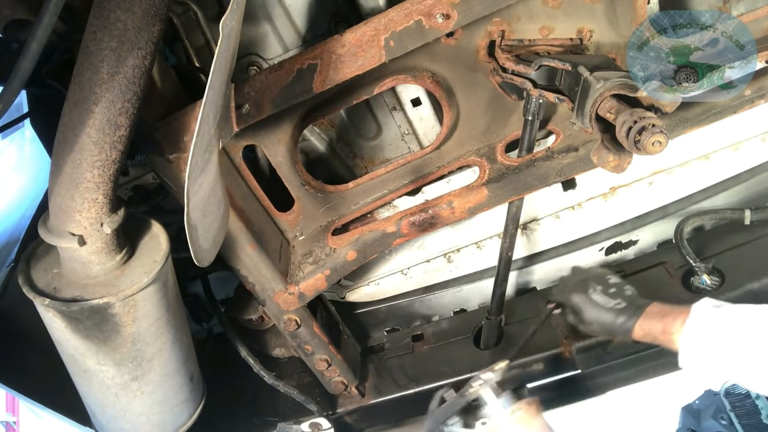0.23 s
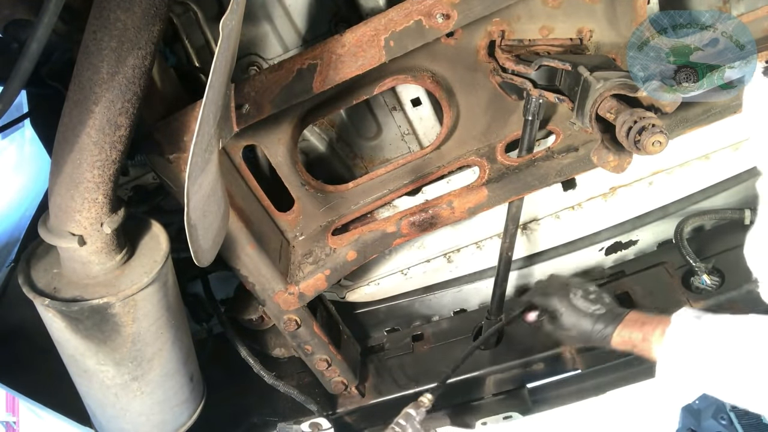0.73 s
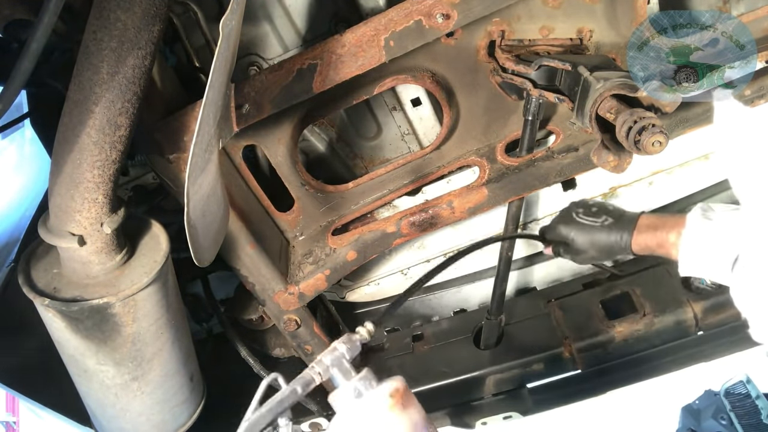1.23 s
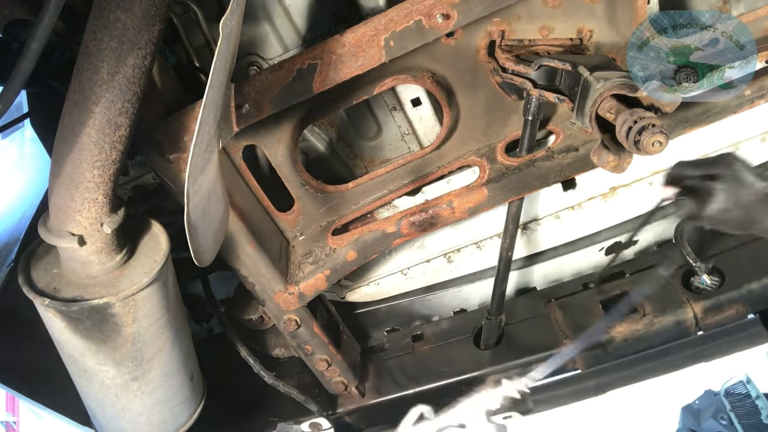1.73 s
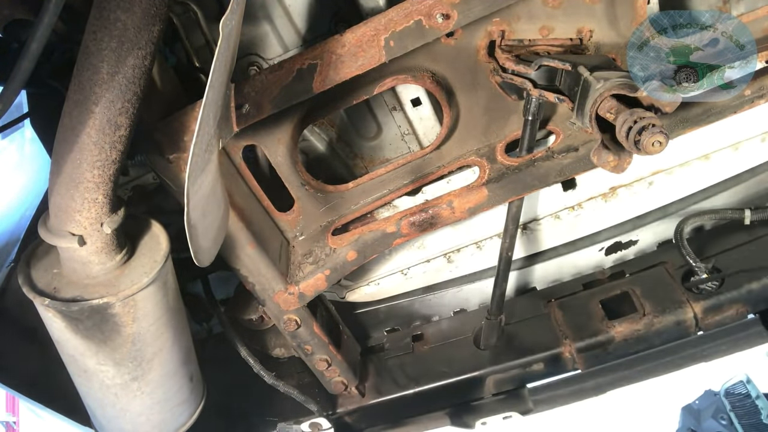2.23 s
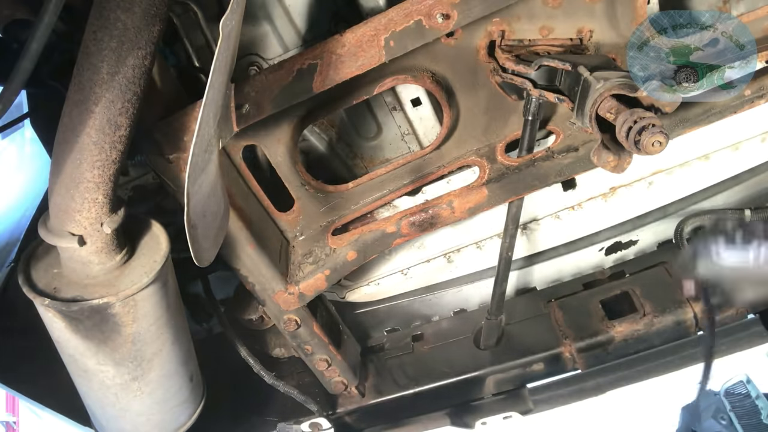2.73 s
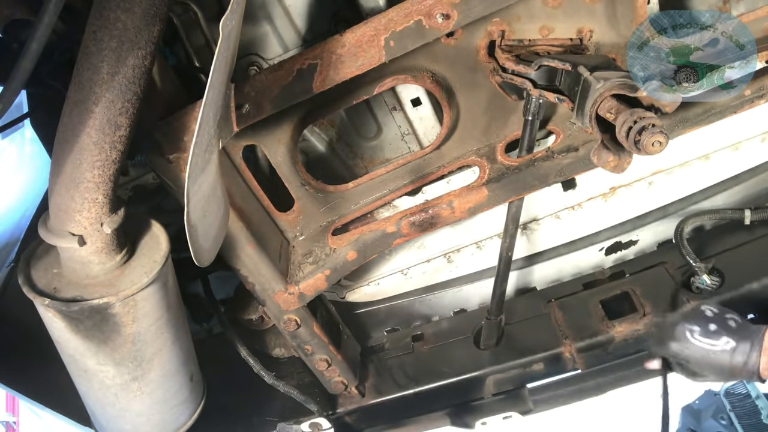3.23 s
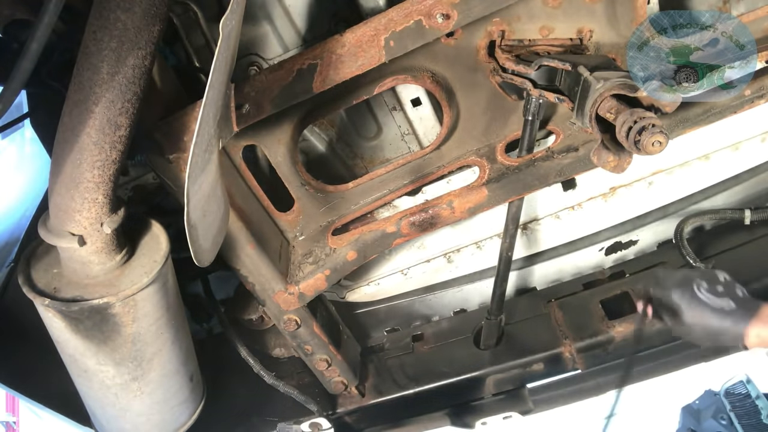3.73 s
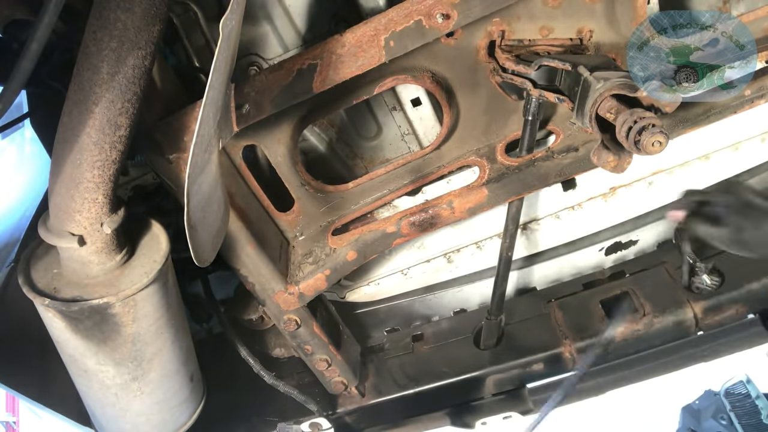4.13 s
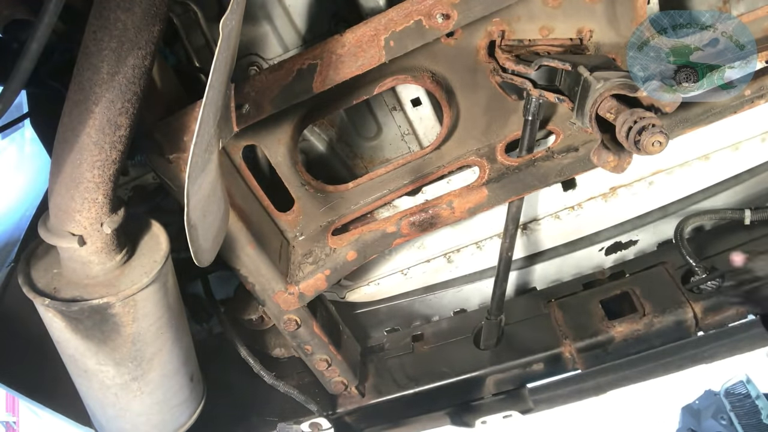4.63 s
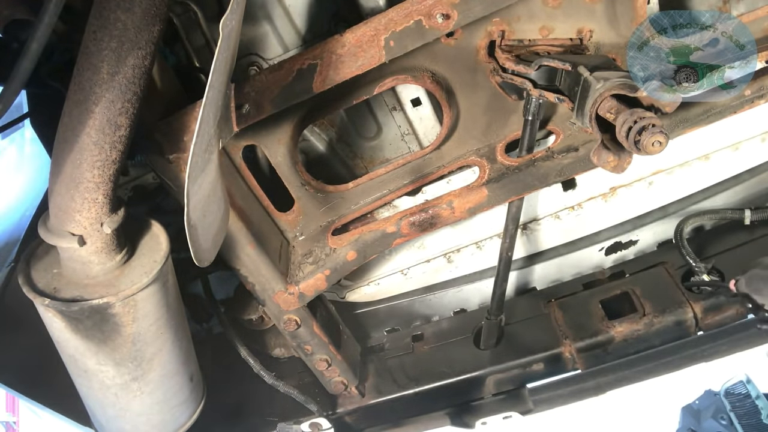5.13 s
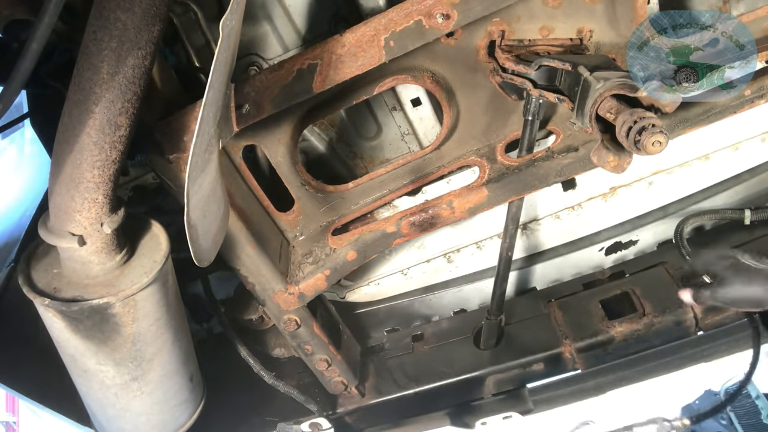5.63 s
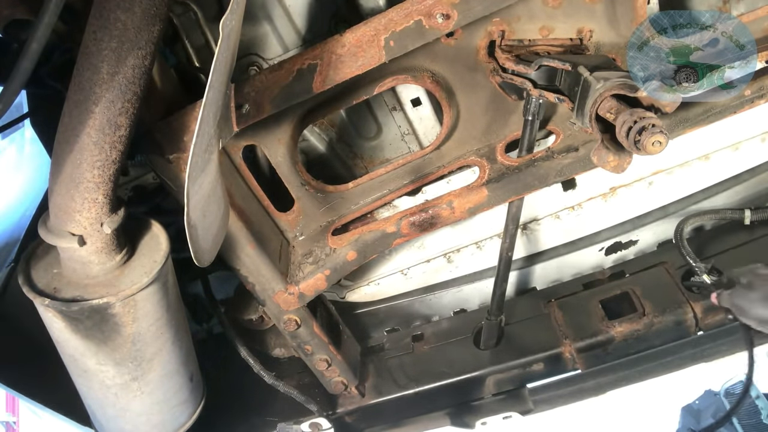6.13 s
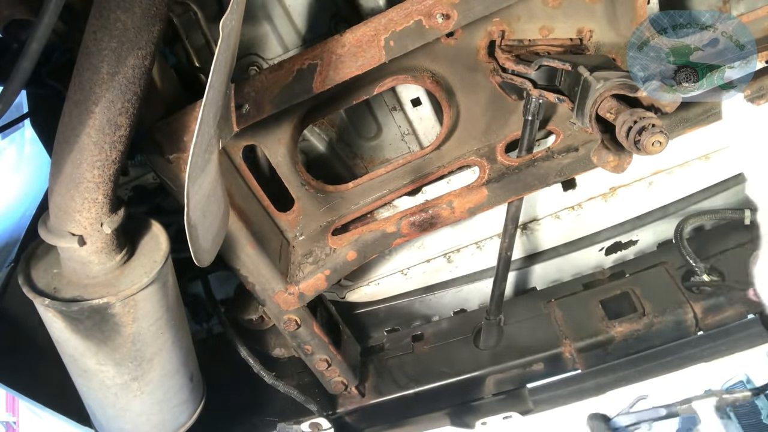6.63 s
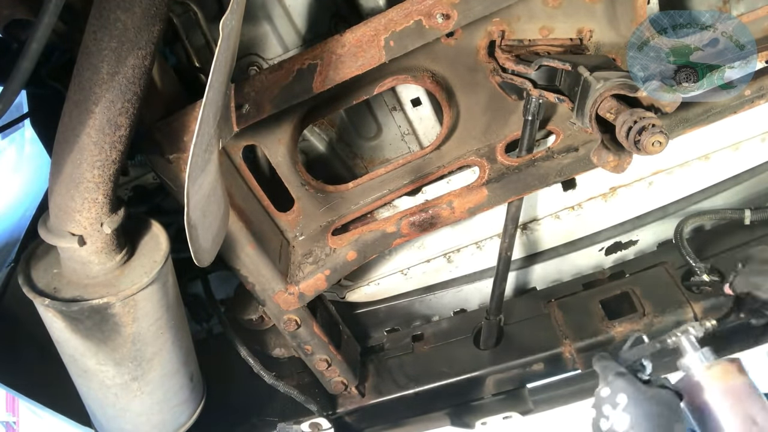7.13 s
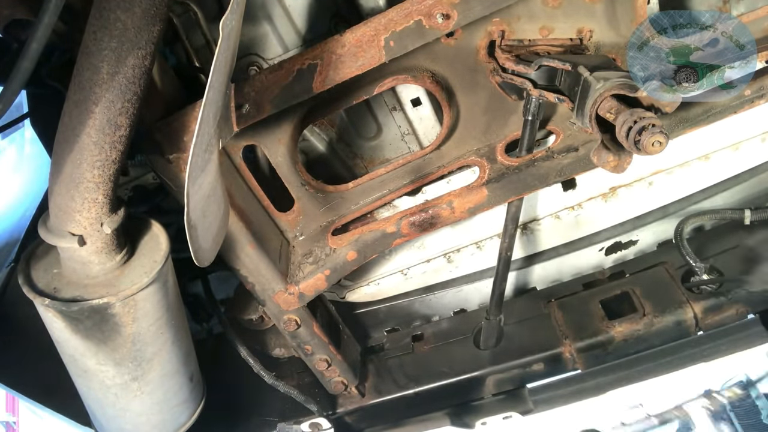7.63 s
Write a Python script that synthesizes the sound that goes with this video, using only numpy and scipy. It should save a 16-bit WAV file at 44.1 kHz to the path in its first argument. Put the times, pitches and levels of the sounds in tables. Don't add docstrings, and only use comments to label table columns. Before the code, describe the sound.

Three bursts of pressurised air and oil mist blow through a hose into a hollow steel sill, heard close and fairly dry. The hiss flutters as the nozzle moves, with low gusty booms, tinny drumming and airy edge tones. The first gap holds metallic knocks and a soft leak; the second, air puffs and a vehicle roaring past, falling in pitch.

```python
import sys
import numpy as np
from scipy import signal
from scipy.fft import rfft, irfft, next_fast_len
from scipy.io import wavfile
from scipy.ndimage import uniform_filter1d, map_coordinates

SR = 44100
rng = np.random.default_rng(int(sys.argv[2]) if len(sys.argv) > 2 else 0)


def to_wav(sig):
    pcm = np.clip(np.atleast_2d(sig), -1, 1) * 32767
    pcm = np.round(pcm).astype(np.int16)
    wavfile.write(sys.argv[1], SR, pcm.T)


def gain_from_db(level_db):
    decades = np.asarray(level_db, float) / 20
    return 10 ** decades


N = 347949
T = np.arange(N) / SR

# opens t/s, shuts t/s, opening time t/s
TRIGGER = [
    (-.1, 1.642, .002),
    (2.13, 5.146, 0.0028),
    (6.322, 8, 0.0042),
]
# t/s, hiss level/dB, fizz above the hiss level/dB
JET = [
    [(0, -25, -1), (.13, -27.5, 3.5), (.74, -24.5, -1), (.93, -25.5, 1), (1.08, -26.5, 1), (1.13, -25, 0),
     (1.34, -24, -2.5), (1.63, -25.5, 0)],
    [(2.13, -31, 10.5), (2.16, -30.5, 4.5), (2.27, -23.5, 3.5), (2.55, -24, -1.5), (3.65, -25, -0.5),
     (4.4, -28, 1.5), (4.51, -24.5, -0.5), (5.13, -23, 0.5)],
    [(6.34, -21.5, -2.5), (6.69, -22.5, -1.5), (6.72, -24.5, -1), (7.31, -23, -1.5), (7.4, -24.5, -0.5),
     (7.66, -24.5, -1), (7.68, -19.5, -3), (7.71, -24, 1.5), (7.89, -22.5, 0)],
]
MOVES = [.3, 2.0, 4.6, 5.8, 6.71]
# f/Hz, width f/Hz, level/dB
PLACES = [
    [(2840, 84, 2), (3540, 80, -9), (5400, 440, -1), (6410, 100, -10)],
    [(3300, 66, -12), (5180, 440, -4), (7250, 110, -5), (9060, 31, -16)],
    [(3190, 160, 0), (3410, 110, -4), (3980, 74, -3.5), (4440, 57, -6), (5220, 75, -4), (5500, 95, -6),
     (5650, 92, -6), (6580, 210, -5.5)],
    [(3310, 66, -4), (4180, 110, -2), (5150, 51, -18), (6600, 340, -1.5), (7900, 97, -2), (8550, 140, -5)],
    [(3150, 230, 1), (3760, 98, 0.5), (4200, 65, -5), (5830, 49, 2), (6370, 41, 4), (6940, 160, 1)],
    [(2865, 50, 1), (3100, 120, -2), (3320, 110, -1), (3700, 70, -2), (5260, 40, -2), (5750, 50, 2),
     (5800, 110, -6), (6150, 80, -5), (6600, 98, 0), (8800, 270, -8), (9500, 300, -8)],
]
# f/Hz, level/dB per Hz
HISS = [(1180, -29), (2000, -28), (2620, -11.5), (2900, -4.5), (3270, 0), (4500, -1), (4950, -5),
        (5300, -3), (6530, -1), (9000, -10), (11700, -11), (19800, -120)]
# f/Hz, level/dB per Hz
FIZZ = [(4100, -12.5), (7000, -0.5), (8100, 1.5), (9300, 4.5), (10400, -0.5), (11200, 5.5), (12300, 5),
        (13800, 5), (16000, 0.5)]
# middle t/s, length t/s, level/dB against the hiss
SPURTS = [(4.08, 0.027, -7), (4.028, 0.01, -12), (2.9, 0.022, -6), (6.333, 0.0032, 0)]

# from t/s, boom, drumming, splash level/dB
AIM = [(0, -41.5, -40, -42), (.28, -44, -35.5, -37), (.42, -45.5, -38.5, -29.5), (1.08, -45, -38.5, -32),
       (1.25, -51, -39.5, -32.5), (2.0, -34.5, -40, -40.5), (2.6, -35.5, -40, -38),
       (3.0, -38.5, -47, -40.5), (3.65, -40.5, -46, -40), (4.0, -35.5, -40, -41), (4.62, -36.5, -43, -41),
       (6.0, -37, -40.5, -40), (6.72, -35.5, -40.5, -42), (7.47, -41.5, -41, -40.5)]
# middle t/s, length t/s, boom level/dB
BOOMS = [(.33, 0.1, -30), (.36, 0.016, -20), (.382, 0.031, -21), (.415, 0.051, -30.5), (.458, 0.023, -22),
         (.69, 0.048, -40.5), (1.58, 0.19, -37), (2.18, 0.041, -28), (2.37, 0.1, -26), (2.49, 0.064, -29.5),
         (2.85, 0.071, -34), (3.31, 0.031, -22.5), (3.39, 0.068, -21), (3.49, 0.21, -26.5),
         (3.62, 0.055, -30.5), (3.91, 0.015, -31), (4.135, 0.04, -29.5), (4.275, 0.037, -29),
         (4.58, 0.044, -28), (4.96, 0.069, -24.5), (6.39, .06, -37), (6.58, 0.19, -27), (6.685, 0.061, -24),
         (6.87, 0.052, -28.5), (7.035, 0.082, -23.5), (7.3, 0.12, -37), (7.37, 0.035, -31),
         (7.43, 0.028, -24.5), (7.71, 0.11, -28), (7.79, 0.095, -25.5), (7.89, 0.052, -22.5)]
# middle t/s, length t/s, drumming level/dB, splash level/dB
STRIKES = [(.38, 0.12, -47, -47), (.69, 0.082, -34, -34), (.79, 0.085, -36.5, -32),
           (.92, 0.093, -32.5, -36), (1.005, 0.047, -37, -25), (1.37, 0.24, -43, -29),
           (1.56, 0.36, -32, -48), (2.3, 0.2, -36, -43), (2.385, 0.031, -28.5, -36),
           (2.51, 0.083, -36, -37), (3.46, 0.21, -30.5, -41), (3.92, .05, -38, -45),
           (4.078, 0.032, -39, -36), (4.48, 0.22, -39.5, -47), (4.585, 0.021, -27.5, -38),
           (4.96, 0.095, -39, -40), (6.42, 0.29, -37, -40), (7.04, 0.073, -31, -53),
           (7.275, 0.092, -24.5, -29), (7.345, 0.082, -24.5, -29.5), (7.44, 0.036, -34, -53),
           (7.5, 0.044, -51, -45), (7.7, 0.097, -34, -44)]
# f/Hz, width f/Hz, level/dB
HOLE_MODES = [(349, 45, -9.5), (428, 43, -14.5)]
# f/Hz, width f/Hz, level/dB
BOX_MODES = [(350.3, 53, 8.5), (482, 127, -8.5), (289, 43, -6.5)]
# f/Hz, width f/Hz, level/dB
PAN_MODES = [(531, 154, -4), (822, 124, -1), (974, 120, -0.5), (1215, 184, -3), (1530, 157, -3.5)]
# f/Hz, width f/Hz, level/dB
PANEL_MODES = [(1535, 99, -0.5), (1677, 230, -1.5), (2017, 99, -0.5), (2220, 104, -0.5), (2550, 220, -3.5)]
# f/Hz, level/dB per Hz
SPLASH = [(760, -30), (1300, -4), (1900, -2), (2500, -1), (3000, -4), (3900, -30), (6600, -120)]
# f/Hz, width f/Hz, level/dB
OPEN_STEEL = [(1540, 90, -6), (1990, 61, -5), (2550, 350, 1)]
# t/s, share 0-1
DEPTH = [(0, 0), (2, 0.6), (2.5, 0.6), (3.5, 0.7), (3.6, 1), (3.95, 0.6), (4.3, 0.3), (4.55, 0),
         (4.65, 0.8), (6.3, 0.7), (6.7, 0.47), (6.75, 1), (7.2, 1), (7.27, 0.5), (7.4, 0.8), (7.45, 1)]
# start t/s, end t/s, from f/Hz, to f/Hz, width f/Hz,
# level/dB
AIR_TONES = [(0, 0.364, 5500, 5380, 300, -31), (0, .3, 7700, 7750, 120, -35),
             (.25, 0.545, 7540, 6760, 150, -37), (0.404, 0.46, 2250, 2350, 200, -33),
             (.45, 0.618, 4980, 5500, 200, -36), (0.72, 0.906, 1990, 1990, 30, -34),
             (.74, .92, 2500, 2460, 60, -39), (0.86, .95, 3080, 3190, 300, -29.5),
             (0.977, 1.043, 2500, 2390, 400, -42), (1.24, 1.45, 2550, 2550, 200, -34),
             (1.25, 1.363, 3490, 3550, 150, -33), (1.467, 1.603, 3400, 3350, 80, -34),
             (1.478, 1.597, 2420, 2500, 200, -32), (2.198, 2.998, 3260, 3270, 50, -37.5),
             (2.754, 3.344, 3980, 3920, 150, -42), (2.8, 3.2, 4400, 4500, 100, -46),
             (2.9, 3.082, 3150, 3200, 120, -31), (3.252, 3.703, 3300, 3250, 90, -35),
             (3.651, 3.885, 3320, 3330, 200, -32), (3.85, 4.147, 3240, 3240, 80, -37),
             (4.3, 4.622, 3260, 3200, 120, -38), (3.353, 3.58, 2320, 2340, 350, -38),
             (3.599, 4.3, 5300, 5220, 80, -44), (4.478, 4.6, 3720, 3720, 80, -34),
             (4.577, 4.947, 4260, 4420, 120, -33.5), (4.58, 4.95, 2890, 2890, 50, -43),
             (4.86, 5.14, 3100, 3150, 200, -34), (4.9, 5.161, 3490, 3610, 100, -34),
             (4.6, 5.0, 5180, 5250, 80, -40), (6.85, 7.645, 2830, 2850, 50, -53),
             (6.99, 7.06, 6150, 6060, 200, -33),
             (.29, .35, 2020, 2030, 40, -38), (.42, .55, 1540, 1540, 40, -36), (.66, 0.73, 3970, 4000, 200, -35),
        (1.103, 1.45, 6600, 6600, 900, -36), (1.5, 1.635, 860, 842, 120, -37),
        (2.24, 2.43, 1490, 1500, 90, -34), (2.47, 2.553, 1470, 1480, 150, -37),
        (2.47, 2.574, 1150, 1127, 100, -37.5), (3.419, 3.548, 967, 985, 120, -32.5),
        (4.42, 4.516, 1127, 1155, 100, -40), (4.43, 4.6, 1530, 1530, 120, -40),
        (6.353, 6.7, 1560, 1573, 80, -47), (6.36, 6.502, 3060, 3260, 120, -29),
        (6.548, 6.703, 3750, 3870, 150, -32), (6.999, 7.09, 855, 943, 300, -41),
        (7.239, 7.365, 2216, 2220, 150, -31), (7.25, 7.332, 1140, 910, 80, -34),
        (5.33, 5.52, 1500, 1776, 120, -56), (2.6, 3.5, 1535, 1535, 40, -49),
        (3.5, 4.4, 1535, 1535, 40, -49), (7.66, 7.707, 3600, 3820, 300, -31),
        (6.718, 7.252, 977, 990, 60, -51), (7.778, 7.89, 6450, 6340, 200, -36)]

# f/Hz, level/dB per Hz
GARAGE = [(8, -6), (30, -1), (100, 1.5), (210, -2), (400, -2), (800, -3), (1200, -4), (1500, -16),
          (3000, -12), (3900, -29), (6600, -120)]
# f/Hz, level/dB per Hz
RUMBLE = [(20, -29), (40, -9), (70, -5), (130, -2.5), (200, 1), (300, -5), (600, -18)]
# t/s, peak level/dB, f/Hz, fade by 60 dB t/s
THUMPS = [(0.149, -43, 94, 0.18), (1.66, -53, 60, .2), (1.96, -54, 70, 0.21), (5.049, -39, 45, 0.17),
          (5.138, -31, 45.7, 0.17), (5.16, -45, 175, .2), (6.97, -39, 55, .25), (7.004, -34, 92, 0.09)]

# middle t/s, length t/s, level/dB
PUFFS = [(1.675, 0.085, -51), (1.9, .08, -63), (2.0, 0.12, -53.5), (2.1, 0.058, -68), (5.23, 0.026, -57),
         (5.39, 0.21, -52.5), (5.54, .07, -55), (5.9, .03, -63), (6.118, .02, -64), (6.205, 0.043, -59),
         (6.3, 0.078, -56.5)]
# f/Hz, level/dB per Hz
LEAK_COLOUR = [
    [(880, -52), (1500, -21), (2400, -21), (3400, -14.5), (5020, -16.5), (6360, -11), (8710, -13),
     (10200, -6), (13400, -18), (14700, -8), (15700, -14)],
    [(760, -38), (1300, -14), (1620, -9), (1990, -17), (2610, -15), (3840, -7.5), (4890, -13), (10300, -13),
     (13200, -15), (15700, -10)],
]
# t/s, peak level/dB, part (0 bracket, 1 sill, 2 rail), rise t/s, brightness level/dB per octave
KNOCKS = [(1.703, -29.5, 1, 0.0114, 0), (1.722, -40, 1, 0.0027, 0), (1.822, -47, 0, .004, -1),
          (1.9, -14, 0, 0.0061, 4), (1.909, -25, 0, 0.0022, -3), (1.947, -22.5, 0, 0.0098, -3),
          (1.986, -31, 0, .01, -8), (2.025, -44, 1, .004, -8), (2.03, -29, 2, 0.0047, -9),
          (2.052, -42, 1, 0.0058, -6), (2.094, -40, 2, .004, 2), (2.1, -38, 0, 0.0093, -8),
          (2.114, -31, 2, .004, -4), (2.114, -33, 0, 0.0043, -6), (5.222, -48, 0, .005, -6)]
# f/Hz, level/dB, fade by 60 dB t/s
STEEL = [
    [(1250, -17, 0.027), (2260, -5, 0.032), (2645, 2, 0.031), (2835, 1, 0.028), (3100, 3, .03),
     (3200, -5, 0.036), (3670, -3, .03), (4200, -10, .03), (4600, -19, .03), (5782, -17, .015),
     (1020, -13, .03), (427, -20, 0.027), (7720, -20, .012)],
    [(380, -3, .05), (707, -1, 0.058), (1023, -10, .06), (1243, -3, 0.095), (1540, -6, .08),
     (1680, -7, 0.037), (2600, -12, .03)],
    [(190, -16, 0.027), (550, 4, 0.043), (696, -4, .05), (1100, -14, .04), (2330, -16, .04)],
]
# t/s, f/Hz
FIRING = [(5.18, 103), (5.55, 105), (5.7, 93), (5.82, 89), (5.92, 78), (6.05, 64), (6.32, 58), (6.5, 56)]
# f/Hz, level/dB per Hz
ROAR = [(6, -14), (30, -5), (80, -5), (170, -3), (366, -6.5), (496, -12), (704, -6), (1050, -11),
        (1380, -20.5), (1800, -24.5), (2930, -27), (8000, -43.5), (10400, -87), (17600, -120)]
# delay t/s, level/dB
ECHOES = [(.0017, -21), (.0043, -19), (.0079, -18), (.0127, -18), (.019, -19)]

STEADY = 0.29
TURN_S = 0.036
SQUARENESS = 2.6
RUMBLE_DB, BLOWN_DB, SHAKE_DB = -60, -55.5, -17.5
SEEP_DB = -56, -64
AIMED_S, AIMED_HZ = 1.84, 8050
SCRAPE_DB = 1
CLOSEST_S, DISTANCE_M, SPEED_M_S = 5.936, 2.74, 28.5
TONE_DB, TONE_SCREENED = -33.5, 0.5
ROAR_DB, ROAR_SCREENED = -28, 0.92
LATE_DB, LATE_S = -4, 6.02
RIPPLE_HZ = 187.5
TOP_HZ = 15770


def unit(x):
    return x / np.sqrt(np.mean(x ** 2) + 1e-20)


def curves(rows):
    s, *cols = np.transpose(rows)
    return [np.interp(T, s, c) for c in cols]


def wobble(rate):
    return map_coordinates(rng.standard_normal(int(N * rate / SR) + 4), [T * rate])


def filtered(x, response):
    m = next_fast_len(N + SR // 2)
    return irfft(rfft(x, m) * response(np.fft.rfftfreq(m, 1 / SR)), m)[..., :N]


def shape(points):
    f, db = np.transpose(points)
    return lambda hz: gain_from_db(np.interp(np.log(hz + 1), np.log(f + 1), db))


def modes(rows):
    def response(f):
        total = 0
        for k, (c, w, db) in enumerate(rows):
            total = total + (-1) ** k * gain_from_db(db) * 1j * f * w / (c * c - f * f + 1j * f * w)
        return total
    return response


def above(hz, edge_hz):
    return (hz / (hz - 1j * edge_hz)) ** 2


def rush(response, patchy_db):
    real, imag, field = rng.standard_normal((3, 257, N // 256 + 3))
    field = uniform_filter1d(field, size=2, axis=0)
    field = uniform_filter1d(field, size=26, axis=1)
    gain = gain_from_db(patchy_db * unit(field))
    noise = signal.istft((real + 1j * imag) * gain, nperseg=512, window="cosine")[1][:N]
    return unit(filtered(noise, response))


def sweeps(rows):
    coarse = T[::64]
    power = 0
    for mid, length, *dbs in rows:
        swell = np.exp(-np.abs((coarse - mid) / (length / 2)) ** SQUARENESS)
        power = power + np.outer(gain_from_db(np.array(dbs)) ** 2, swell ** 2)
    return np.array([np.interp(T, coarse, row) for row in np.sqrt(power)])


def valve(surge_db, lag, shut_s):
    flow = np.zeros(N)
    for on, off, open_s in TRIGGER:
        since = np.maximum(T - on, 0)
        surge = gain_from_db(surge_db * np.exp(-since / 0.012))
        rise = (1 - np.exp(-since / (lag * open_s))) ** 2 * surge
        flow += rise * np.exp(-np.maximum(T - off, 0) / shut_s)
    return flow


def jet():
    hiss_db, fizz_db = curves(np.concatenate(JET))
    place = sum(np.clip((T - s) / 0.08, 0, 1) for s in MOVES)
    hiss = np.zeros(N)
    for k, rows in enumerate(PLACES):
        def colour(hz):
            ringing = gain_from_db(2.5) * abs(modes(rows)(hz)) / (1 + (2650 / (hz + 1)) ** 12)
            return np.hypot(shape(HISS)(hz), ringing)
        here = np.sqrt(np.clip(1 - abs(place - k), 0, 1))
        hiss += here * rush(colour, patchy_db=2.4)
    sputter = 0.8 * wobble(35) + 0.37 * wobble(9)
    fizz = gain_from_db(fizz_db) * rush(shape(FIZZ), patchy_db=2.5)
    air = gain_from_db(hiss_db + sputter) * (hiss + fizz)
    air = air * (1 + sweeps(SPURTS)[0])
    return valve(surge_db=12, lag=1, shut_s=0.0045) * air


def driven():
    held = []
    for (s, *new), (_, *old) in zip(AIM, AIM[:1] + AIM):
        held += [(s, *old), (s + TURN_S, *new)]
    return np.hypot(gain_from_db(np.array(curves(held))), np.vstack([sweeps(BOOMS), sweeps(STRIKES)]))


def notch(mid_hz, width):
    def response(hz):
        offset = hz * hz - mid_hz ** 2
        return offset / (offset - 1j * width * hz)
    return response


def box_air(rows):
    return rush(lambda hz: modes(rows)(hz) * above(hz, 170) / (1 + 1j * hz / 600) ** 2, patchy_db=0.73)


def sill(boom, drum, splash):
    air = boom * gain_from_db(0.67 * wobble(25)) * np.where(T < 0.6, box_air(HOLE_MODES), box_air(BOX_MODES))

    pan = lambda hz: modes(PAN_MODES)(hz) * above(hz, 550) / (1 + (hz / 1700) ** 8)
    floor = drum * gain_from_db(0.78 * wobble(30)) * rush(pan, patchy_db=1.5)
    deep = np.clip(curves(DEPTH)[0], 0, 1)
    inner = np.where(T < 4.6, filtered(floor, notch(1520, 210)), filtered(floor, notch(1340, 500)))
    floor = (1 - deep) * floor + deep * inner

    outside = np.interp(T, [.3, .5, 1.7, 2.1], [0, 1, 1, 0])
    panels = rush(lambda hz: modes(PANEL_MODES)(hz) / (1 + (1450 / (hz + 1)) ** 12), patchy_db=1.8)
    open_colour = lambda hz: np.hypot(shape(SPLASH)(hz), abs(modes(OPEN_STEEL)(hz)))
    spray = np.sqrt(1 - outside) * panels + np.sqrt(outside) * rush(open_colour, patchy_db=1.0)
    return air + floor + splash * gain_from_db(1.35 * wobble(30)) * spray


def whistles():
    out = np.zeros(N)
    for start, end, from_hz, to_hz, width, db in AIR_TONES:
        first, count = round(start * SR), round((end - start) * SR)
        real, imag = rng.standard_normal((2, SR))[:, :count]
        narrow = 1 + (2 * np.fft.fftfreq(count, 1 / SR) / width) ** 2
        beat = np.fft.ifft(np.fft.fft(real + 1j * imag) / narrow)
        beat = beat / (abs(beat) + 1e-9) ** STEADY
        turn = 2 * np.pi * np.cumsum(np.linspace(from_hz, to_hz, count)) / SR
        tone = unit((beat * np.exp(1j * turn)).real)
        out[first:first + count] += gain_from_db(db) * tone * signal.windows.tukey(count, .5)
    return out


def garage(flow, boom):
    steady = (gain_from_db(RUMBLE_DB) + gain_from_db(BLOWN_DB) * flow) * gain_from_db(0.69 * wobble(3.9))
    rumble = np.hypot(steady, gain_from_db(SHAKE_DB) * boom * (T > .6))
    still = gain_from_db(-57.5) * rush(shape(GARAGE), patchy_db=1.0)
    return still + rumble * rush(shape(RUMBLE), patchy_db=0.5)


def thumps():
    out = np.zeros(N)
    for s, db, hz, t60 in THUMPS:
        since = np.maximum(T - s, 0)
        swell = 1 - np.exp(-since / 0.01)
        out += gain_from_db(db + 7.5 - 60 * since / t60) * swell * np.sin(2 * np.pi * hz * since)
    return out


def leak():
    first, second = (rush(shape(colour), patchy_db=.8) for colour in LEAK_COLOUR)
    turned = np.clip((T - AIMED_S) / .06, 0, 1)
    shaded = filtered(first, lambda hz: 1 / np.hypot(1, (hz / AIMED_HZ) ** 2))
    first = turned * first + (1 - turned) * shaded
    seep = gain_from_db(np.where(T < 4, *SEEP_DB) + wobble(30))
    flow = np.hypot(seep, sweeps(PUFFS)[0])
    return gain_from_db(12.0) * flow * np.where(T < 4, first, second)


def knocks():
    out, t = np.zeros(N + SR), np.arange(SR // 6) / SR
    for s, db, part, rise_s, bright_db in KNOCKS:
        hz, level_db, t60 = np.transpose(STEEL[int(round(part))])[..., None]
        chance = rng.standard_normal((2, 14, 1))[:, :len(hz)]
        level_db = level_db + bright_db * np.log2(hz / hz[1]) + 1.5 * chance[0]
        push = np.clip(t / rise_s, 0, 1) ** 1.7
        fade_db = -60 * np.maximum(t - rise_s, 0)

        tones = gain_from_db(level_db + fade_db / t60) * np.sin(2 * np.pi * hz * t + np.pi * chance[1])
        ring = tones.sum(axis=0) * push
        grit = rng.standard_normal(len(t)) * gain_from_db(fade_db / (0.7 * t60[1])) * push
        broad = modes([(1.07 * hz[1], 0.51 * hz[1], 0), (2.6 * hz[1], 1.7 * hz[1], -8 + bright_db)])
        scrape = irfft(rfft(grit) * broad(np.fft.rfftfreq(len(t), 1 / SR)), len(t))

        contact = ring / abs(ring).max() + gain_from_db(SCRAPE_DB) * scrape / abs(scrape).max()
        out[round(s * SR):][:len(t)] += gain_from_db(db) * contact / 1.42
    return out[:N]


def engine():
    far_db = -20 * np.log10(np.hypot(1, SPEED_M_S * (T - CLOSEST_S) / DISTANCE_M))
    tone_db, roar_db = TONE_DB + TONE_SCREENED * far_db, ROAR_DB + ROAR_SCREENED * far_db
    near = np.interp(T, [5.0, 5.15, 5.33, 6.3, 6.52], [0.03, 0.14, 1, 0.92, 0.03])
    turn = 2 * np.pi * np.cumsum(curves(FIRING)[0] * (1 + .01 * wobble(18))) / SR
    uneven_db = 1.2 * wobble(22)
    harmonics = np.sin(turn) + 0.3 * np.sin(2 * turn) + 0.25 * np.sin(3 * turn)
    tone = gain_from_db(tone_db + uneven_db) * harmonics
    mirrored_db = tone_db + LATE_DB - (np.abs(T - LATE_S + .08) / 0.11) ** 3 * 6
    tone = tone + gain_from_db(mirrored_db) * np.sin(2 * np.pi * 106 * T)
    throb = 1 + 0.064 * np.cos(turn / 2)
    roar = gain_from_db(roar_db + 0.49 * wobble(24)) * throb * rush(shape(ROAR), patchy_db=0.5)
    return near * (tone + roar)


def reflected(x):
    def early(hz):
        echoes = sum(gain_from_db(db) * np.exp(-2j * np.pi * hz * s) for s, db in ECHOES)
        return 1 + echoes / (1 + 1j * hz / 5000)
    t = np.arange(SR // 3) / SR
    tail = rng.standard_normal(len(t)) * gain_from_db(-60 * t / 0.059)
    late = signal.fftconvolve(x, tail / np.linalg.norm(tail))[:N]
    return gain_from_db(-0.23) * filtered(x, early) + gain_from_db(-18) * late


def scene():
    flow = valve(surge_db=2.0, lag=0.9, shut_s=0.0062)
    gains = flow * driven()
    at_car = jet() + sill(*gains) + whistles() + knocks()
    mono = reflected(at_car) + garage(flow, gains[0]) + thumps() + leak() + engine()
    return np.array([mono, mono])


def unmatched(mono, share, level_db):
    hz, t, z = signal.stft(mono, SR, nperseg=2048)
    edges = [4100, 5200, 6300, 7700, 9200, 10600, 12400, 13900, 16000]
    chosen = np.pad(rng.random((len(edges) - 1, len(t))) < share, ((1, 1), (0, 0)))
    scrambled = z * chosen[np.searchsorted(edges, hz)] * np.exp(2j * np.pi * rng.random(z.shape))
    return gain_from_db(level_db) * signal.istft(scrambled, SR, nperseg=2048)[1][:N]


def band_limit(x):
    return signal.sosfilt(signal.butter(12, 17000, fs=SR, output="sos"), x)


def record(dry):
    ripple = 1 + .05 * np.sin(2 * np.pi * RIPPLE_HZ * T)
    mono = filtered(dry[0] * ripple, lambda hz: hz < TOP_HZ)
    side = unmatched(mono, share=.016, level_db=-2.5)
    return band_limit(np.array([mono + side, mono - side]))


dry = scene()
out = record(dry)
to_wav(out)
```